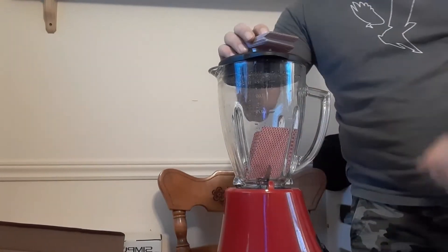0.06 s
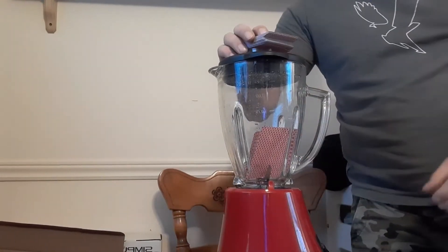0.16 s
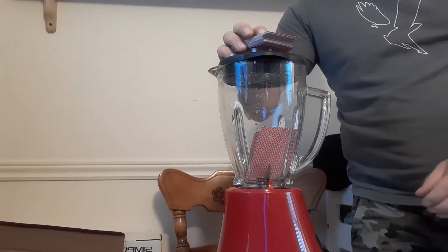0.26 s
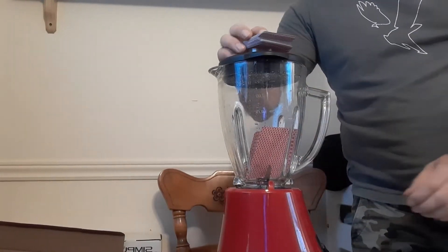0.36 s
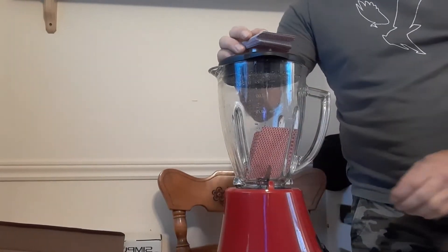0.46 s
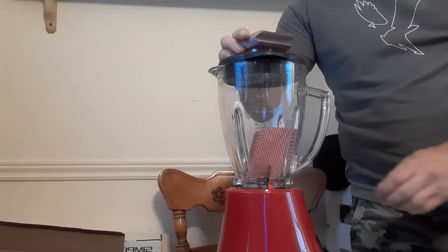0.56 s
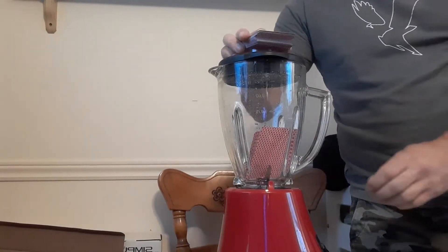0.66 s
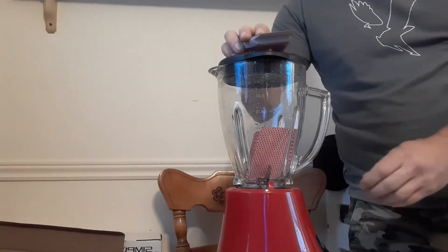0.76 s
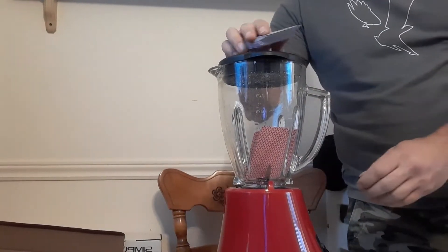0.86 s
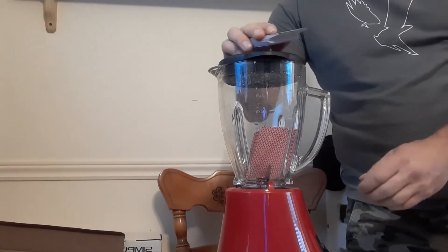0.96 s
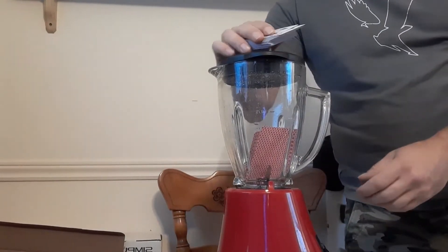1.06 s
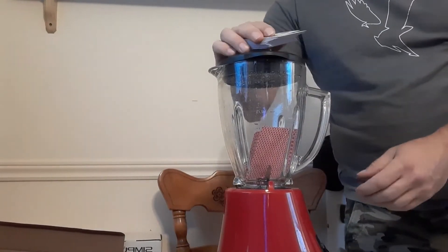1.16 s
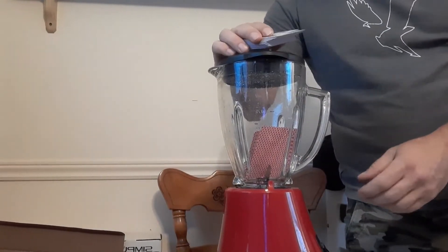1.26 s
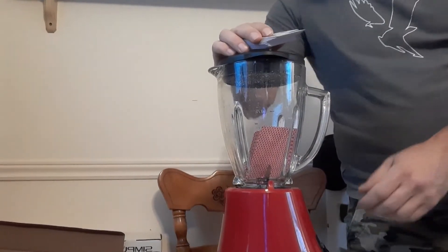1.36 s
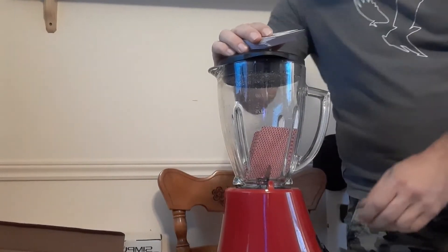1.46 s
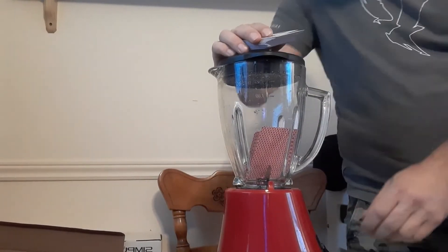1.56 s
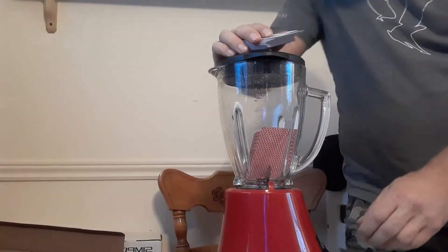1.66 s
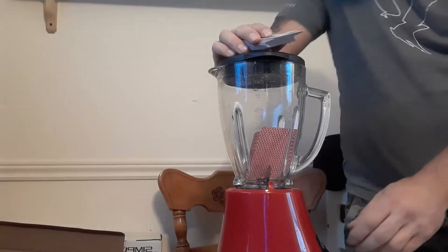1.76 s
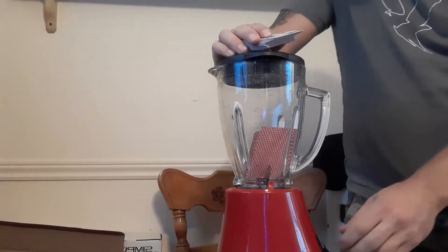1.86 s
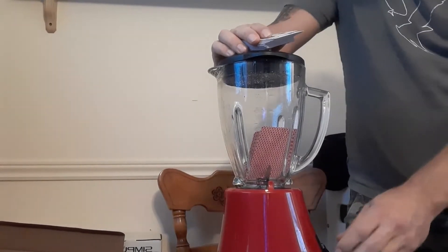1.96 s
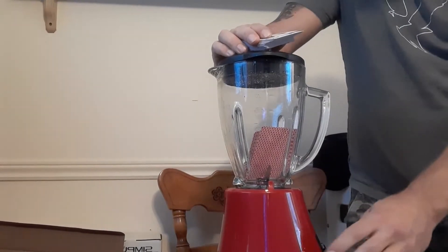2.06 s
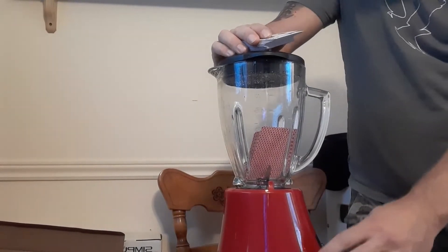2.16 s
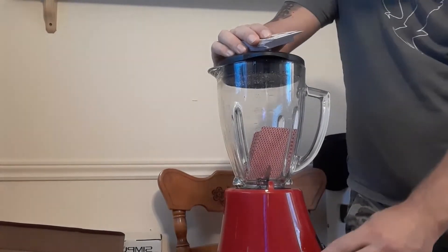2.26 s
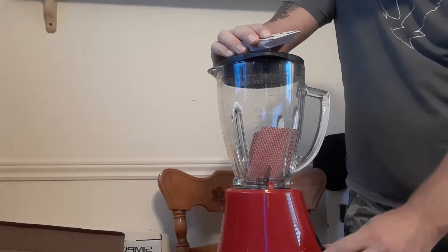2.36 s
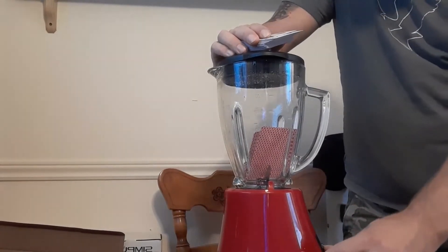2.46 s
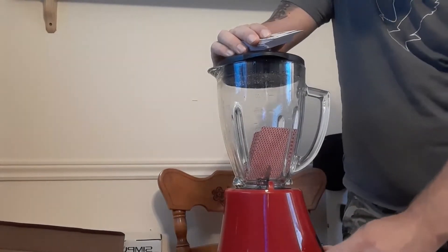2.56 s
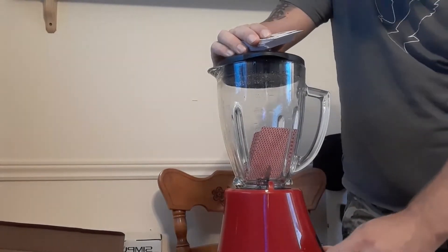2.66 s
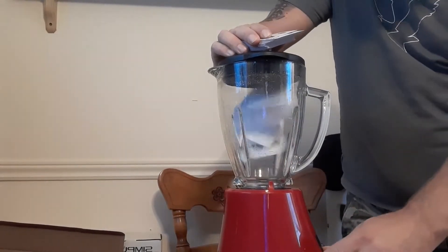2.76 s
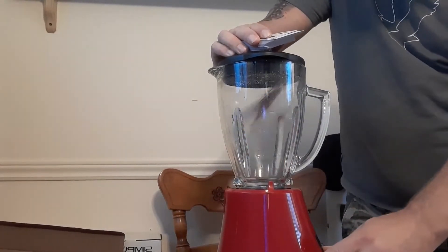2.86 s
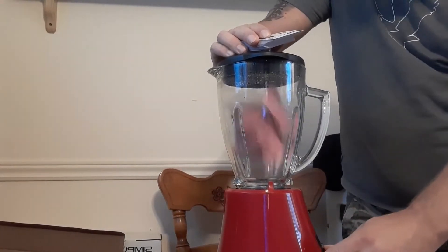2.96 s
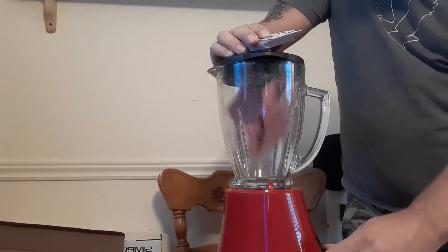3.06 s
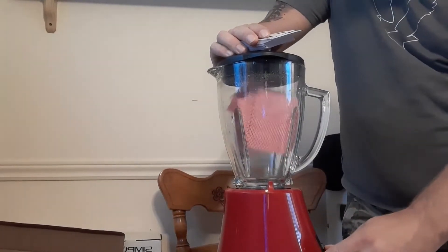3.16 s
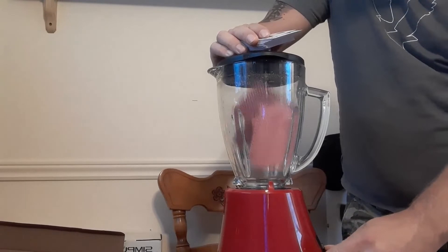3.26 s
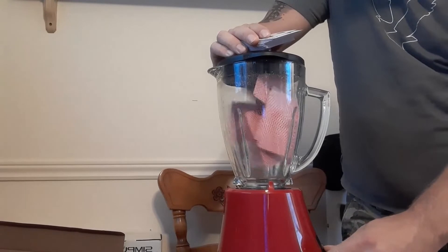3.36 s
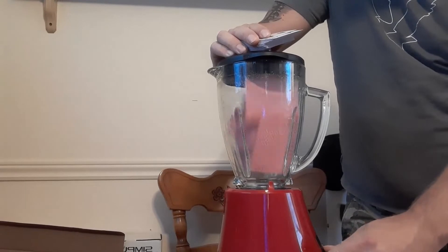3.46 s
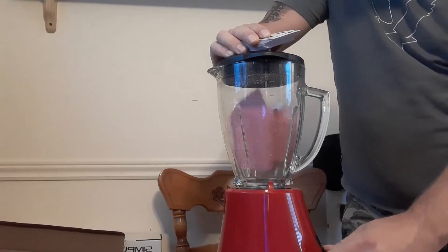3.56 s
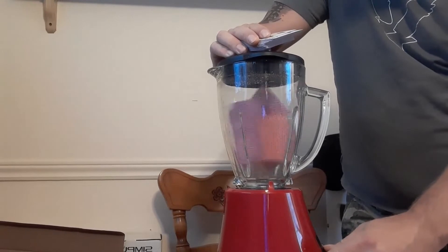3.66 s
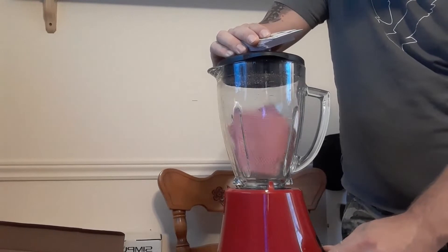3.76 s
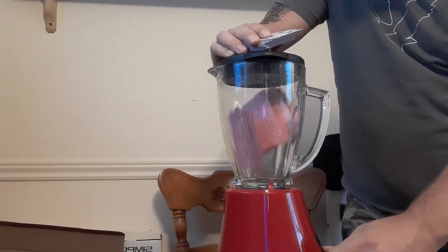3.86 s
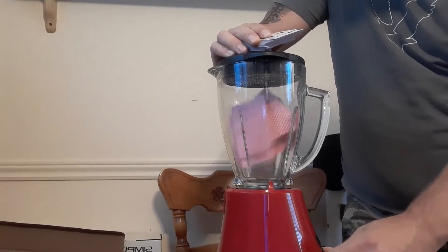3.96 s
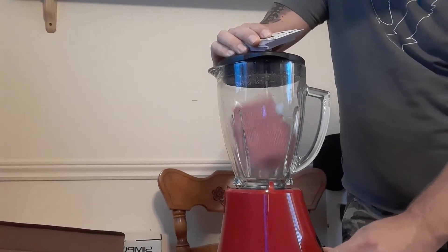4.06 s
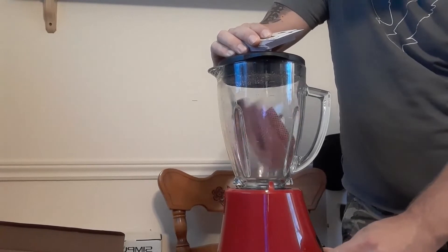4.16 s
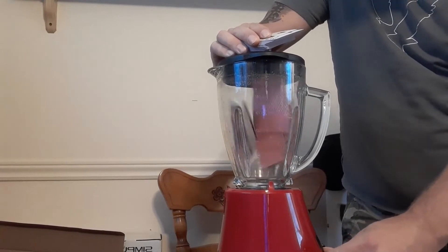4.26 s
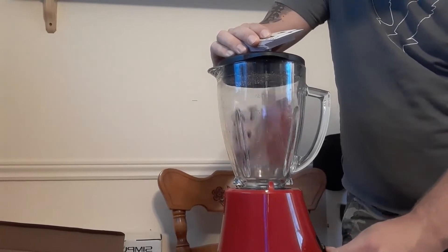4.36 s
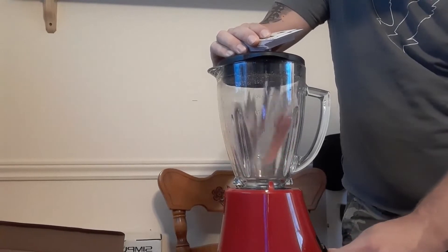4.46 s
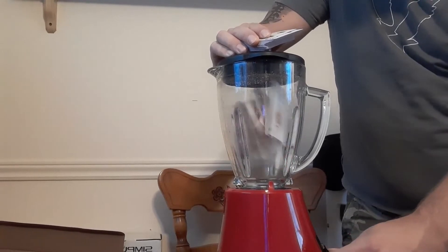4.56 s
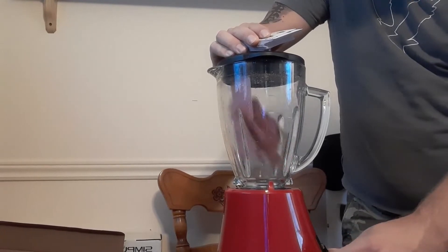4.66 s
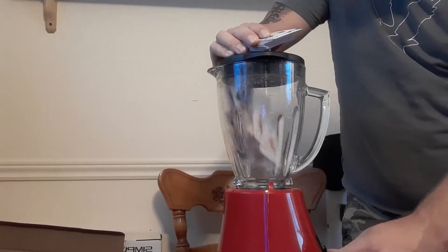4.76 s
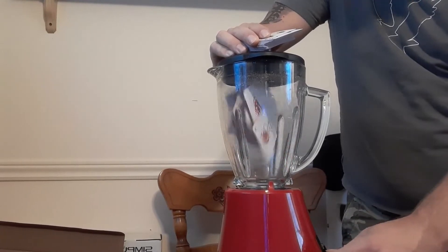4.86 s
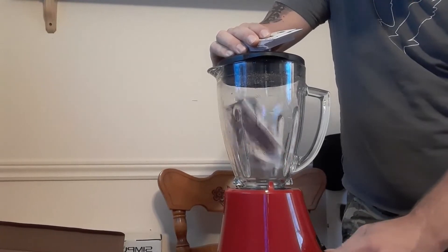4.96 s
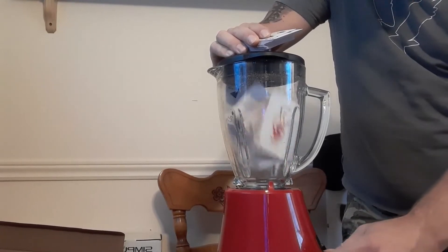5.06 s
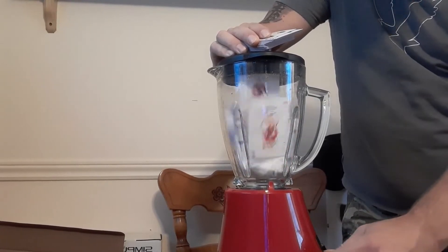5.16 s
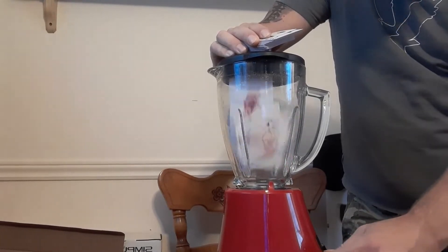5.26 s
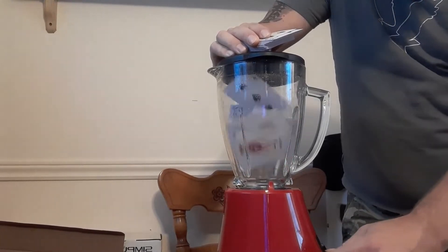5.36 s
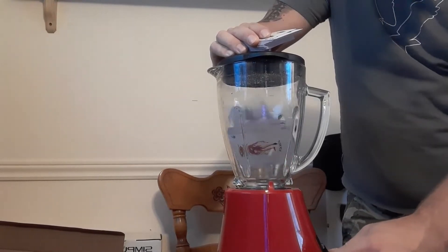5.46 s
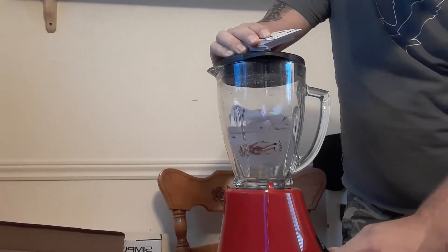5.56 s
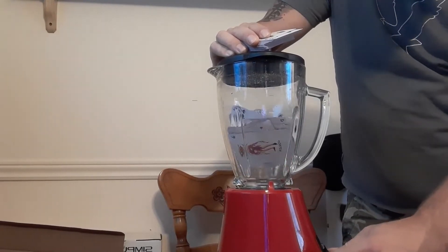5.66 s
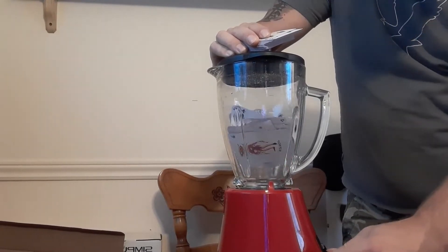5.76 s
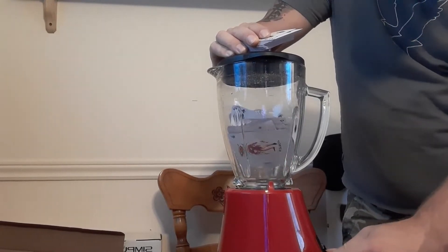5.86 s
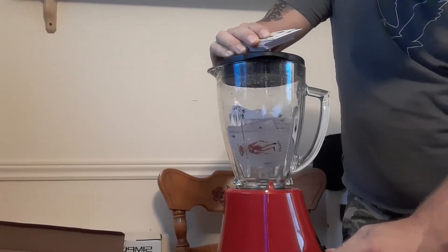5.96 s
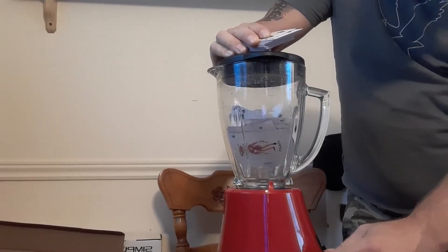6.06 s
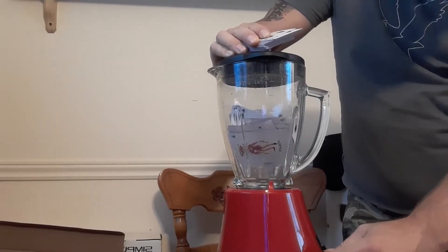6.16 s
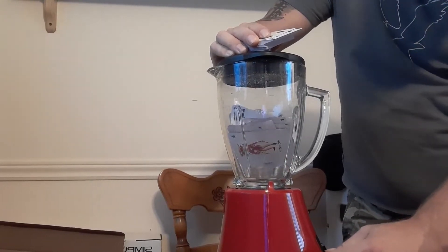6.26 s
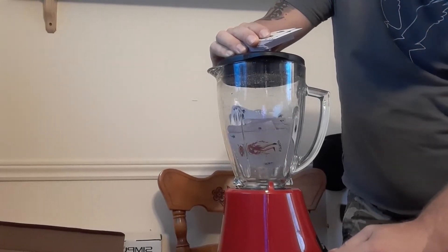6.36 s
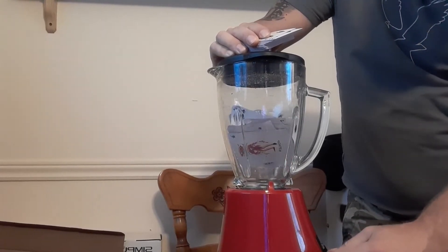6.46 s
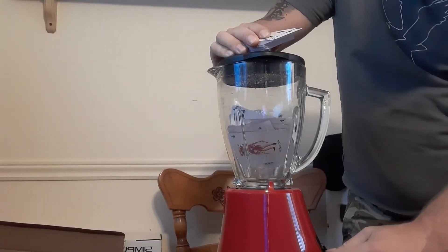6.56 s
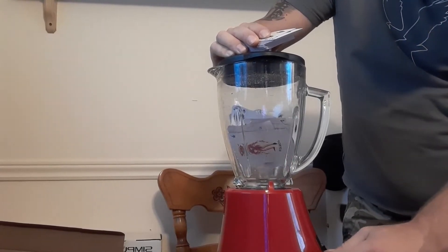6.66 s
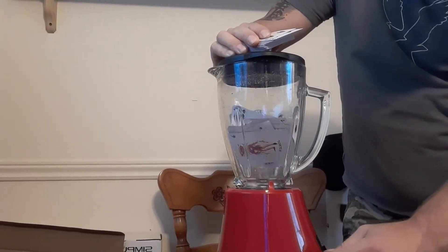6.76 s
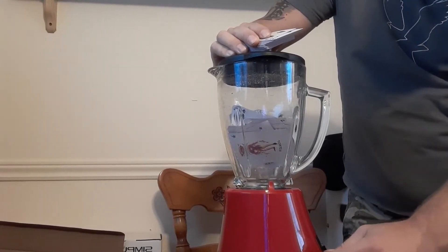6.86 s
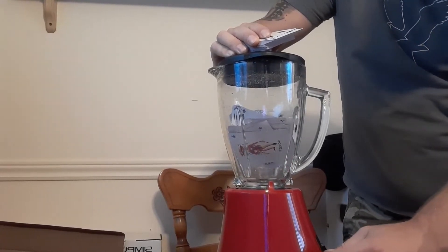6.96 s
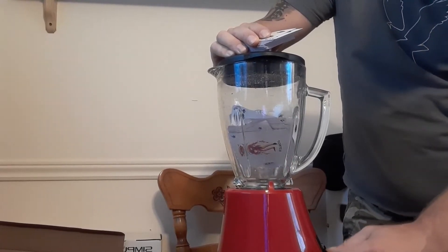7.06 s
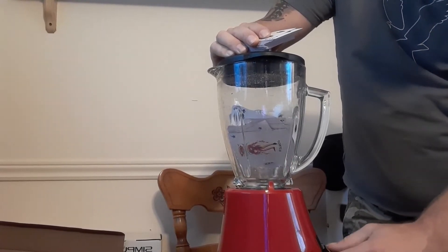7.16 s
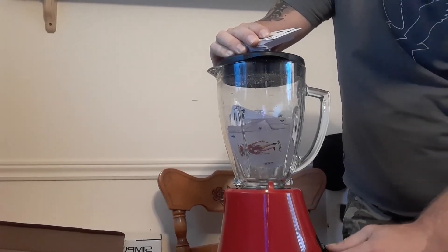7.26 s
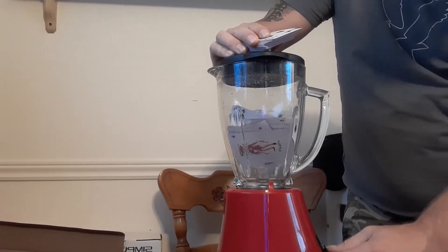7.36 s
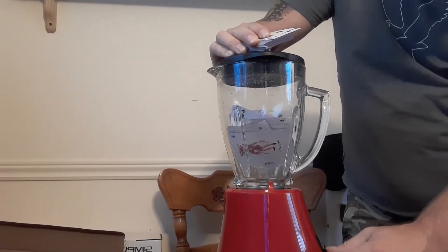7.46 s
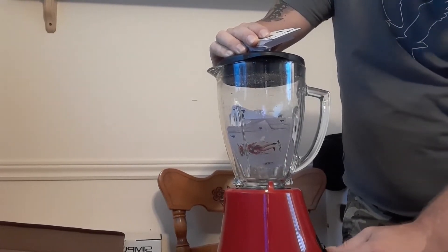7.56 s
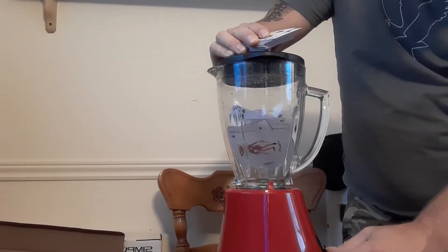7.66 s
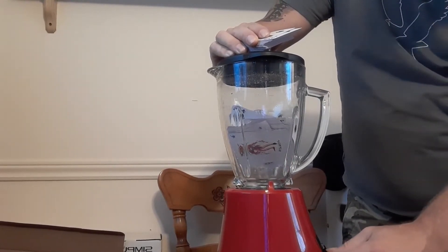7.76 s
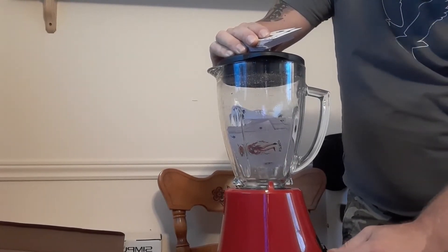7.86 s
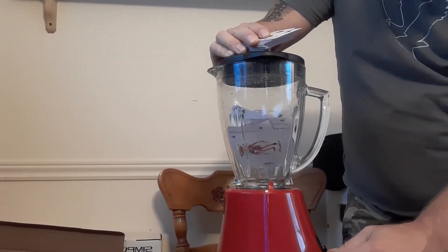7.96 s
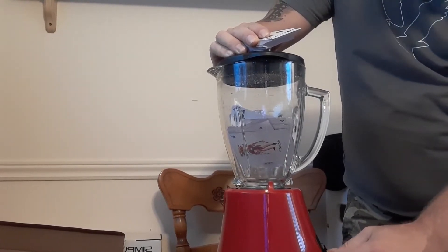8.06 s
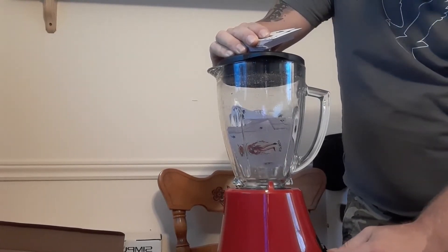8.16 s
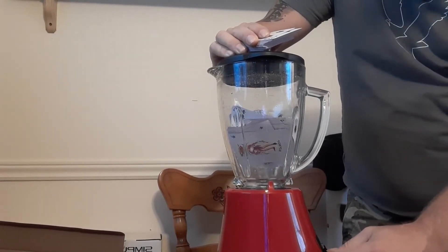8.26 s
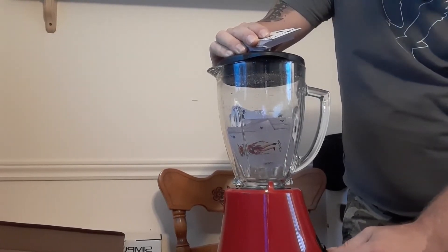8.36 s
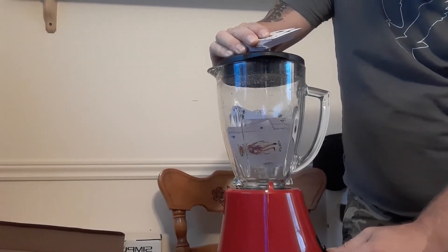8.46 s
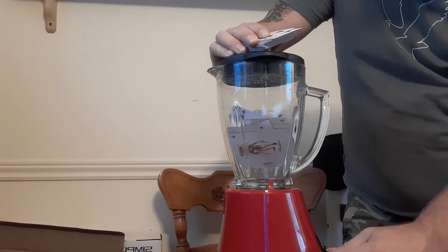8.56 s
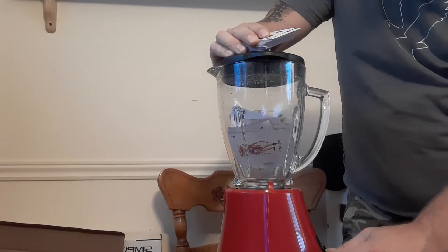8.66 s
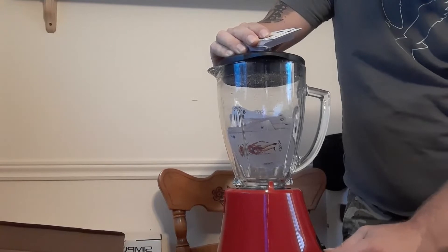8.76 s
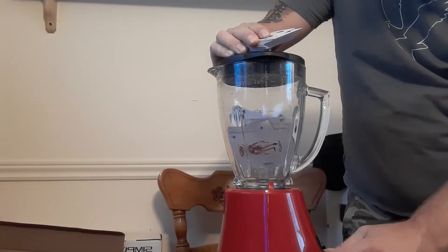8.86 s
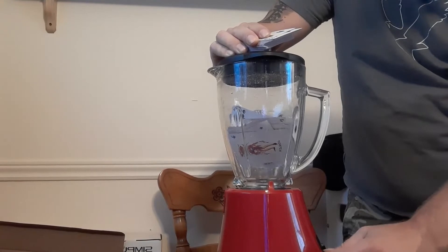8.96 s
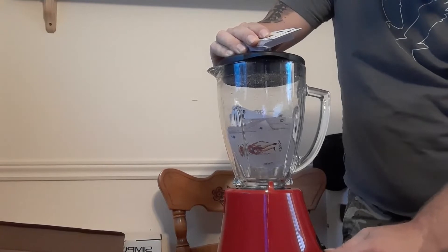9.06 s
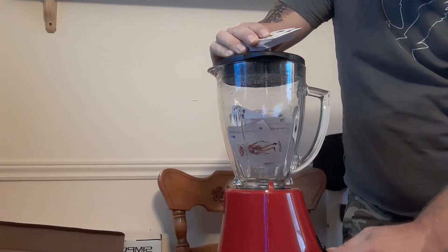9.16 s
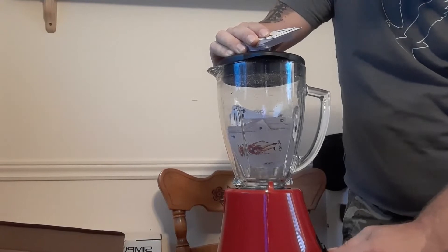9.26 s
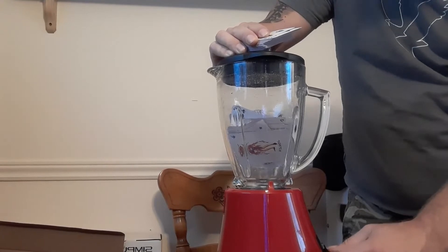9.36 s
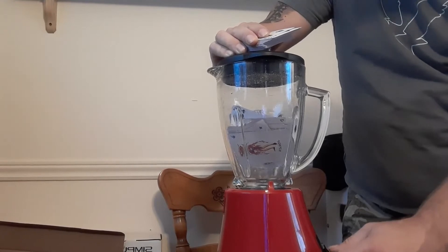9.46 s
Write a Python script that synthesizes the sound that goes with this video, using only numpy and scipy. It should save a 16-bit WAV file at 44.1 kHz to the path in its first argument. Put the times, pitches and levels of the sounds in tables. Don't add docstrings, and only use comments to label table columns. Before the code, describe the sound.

In a small quiet room, close up, cloth rustles, boards creak and hands thud and click softly for nearly three seconds. A glass-jar blender then bursts on with a loud clatter of cards striking blades and glass. Repeated pulses make the motor whine rise and sag; the slapping thins out after six seconds, leaving whirr and coasting hum, until a sharp click starts a final strong run.

```python
import sys
import numpy as np
from scipy import signal
from scipy.fft import rfft, irfft, next_fast_len
from scipy.io import wavfile
from scipy.ndimage import uniform_filter1d

SR = 44100
rng = np.random.default_rng(int(sys.argv[2]) if len(sys.argv) > 2 else 0)


def unload_wav(signal):
    wavfile.write(
        sys.argv[1],
        SR,
        np.round(np.clip(np.atleast_2d(signal).T, -1, 1) * 32767).astype(np.int16),
    )


def makeup_ratio(level_db):
    decades = np.asarray(level_db, float) / 20
    return 10 ** decades


N = 418950
T = np.arange(N) / SR

# f/Hz, density/dB per Hz
HUSH = [(15, -48), (25, -23), (91, 7.5), (156, -24), (228, 6), (333, -11), (618, -22), (767, -18),
        (1250, -21), (1630, -19), (1870, -21), (5200, -28), (6630, -20), (15700, -45)]
HUSH_DB = -66
# f/Hz, share/1
DIRECT_SHARE = [(100, .98), (400, .92), (900, .68), (2500, .68), (5000, .33), (10000, .06)]
# f/Hz, left over right/dB
LEFT_DB = [(60, -0.5), (150, 4.5), (380, 2), (950, 4), (2380, 5), (5980, -0.5), (15000, 6)]
# f/Hz, t60/s
ROOM_T60 = [(150, 0.29), (1000, 0.17), (4000, 0.21), (12000, 0.23)]

# t/s, floor boards level/dB, thin rustle level/dB, fade/dB per s
MOVES = [
    (.02, -74, -57, 100),
    (.33, -60.5, -85, 54),
    (.67, -64, -83, 30),
    (.81, -67, -53.5, 40),
    (1.01, -59.5, -55, 72),
    (1.48, -76, -51, 47),
    (1.67, -61.5, -51, 30),
    (1.86, -63, -48.5, 45),
    (2.07, -58, -39, 111),
    (2.48, -55, -61.5, 112),
]
SWELL_DB_PER_S, CLOTH_DB, RUSTLE_QUICKER, REST_DB = 127, -16.5, 2.3, -81.5
# t/s, peak level/dB, ring f/Hz, crack re peak/dB, t60/s
THUDS = [(0.204, -42.5, 308, -8, 0.21), (0.569, -50, 297, -16, 0.15), (0.78, -51, 335, -21, 0.13),
         (0.891, -47, 312, -20, 0.12), (0.999, -49, 323, -13, 0.31), (1.667, -43.5, 306, -3, 0.17),
         (1.767, -33, 423, -4, 0.06), (1.789, -29.5, 323, -12, 0.071), (1.935, -40.5, 308, -18, 0.21),
         (2.058, -45.5, 405, -11, 0.19), (2.074, -39, 272, -7.5, 0.24), (2.425, -35, 327, -17, 0.097),
         (2.526, -47, 293, -14, 0.13)]
# t/s, peak level/dB, ring f/Hz, t60/s
CLICKS = [(0.3047, -51, 2000, 0.015), (0.3397, -42, 2000, 0.015), (0.3504, -53, 2110, 0.015),
          (0.3805, -38.5, 2000, 0.015), (0.784, -49, 1630, 0.015), (1.1747, -56, 4600, 0.015),
          (1.6676, -41, 1370, 0.016), (1.8444, -54, 1910, 0.015), (1.9175, -47, 2070, 0.015),
          (2.3684, -63, 1440, 0.015), (2.5194, -61, 1460, 0.015), (2.5294, -66, 1250, 0.015),
          (2.6014, -55, 1260, 0.015), (2.7206, -21, 3260, 0.015), (3.864, -11, 3160, 0.011),
          (8.6789, -51, 1241, 0.015), (8.7206, -14.5, 2665, 0.011)]
# start t/s, end t/s, f/Hz, width/Hz, level/dB
SLIDES = [
    (0.289, 0.457, 2000, 700, -64),
    (0.55, .95, 7500, 500, -78),
    (.78, .93, 1800, 600, -72),
    (1.396, 1.56, 2730, 500, -74),
    (2.36, 2.43, 1300, 700, -67),
    (2.5, 2.66, 1190, 604, -78),
]

# t/s, peak level/dB, ring f/Hz, t60/s
FLATS = [(2.7487, -17, 2600, 0.16), (2.7796, -6, 1790, 0.076), (2.9719, -4, 2760, 0.073),
         (3.141, -7, 3510, 0.066), (3.2952, -11.5, 1260, 0.19), (3.3942, -12.5, 1080, 0.15),
         (3.761, -17, 3140, 0.16), (4.0356, -13, 1280, 0.051), (4.0914, -9.5, 2613, 0.13),
         (4.1864, -27, 3120, .091), (4.5268, -13, 3930, 0.19), (4.567, -7, 2606, 0.08),
         (4.7508, -6.5, 2560, .048), (5.0895, -11, 3530, 0.046), (5.234, -6, 2650, 0.056),
         (5.2822, -11.5, 3470, 0.16)]
# t/s, peak level/dB, ring f/Hz, t60/s
NICKS = [(2.8701, -5, 2600, 0.06), (2.988, -19, 3050, .063), (3.1219, -15, 1320, 0.16),
         (3.48, -17.5, 2030, 0.45), (3.5994, -12.5, 3090, 0.079), (3.923, -15.5, 2580, 0.1),
         (4.2173, -11.5, 3130, 0.17), (4.3876, -9.5, 1267, 0.15), (4.6932, -14, 1280, 0.22),
         (4.777, -10, 3180, 0.066), (4.931, -19, 4020, 0.15), (4.9756, -10, 1320, 0.072),
         (5.521, -7, 4100, 0.044), (5.815, -13, 2600, 0.07), (5.885, -10, 3060, 0.053),
         (8.504, -32, 2560, 0.085), (8.5829, -44, 3180, 0.06), (8.6537, -39, 1247, .071),
         (8.8044, -19, 3050, 0.053), (6.143, -11, 2600, 0.067)]
FLAT_THUMP_DB, NICK_THUMP_DB = -6, -11
# f/Hz, width/Hz, level/dB
JAR = [(1103, 16, 6), (1260, 94, 10), (2000, 190, 6), (2410, 30, 7.5), (2591, 47, 10.5), (2680, 45, 5),
       (2820, 100, 4.5), (3130, 116, 4), (3560, 85, 3.5), (3890, 260, 3.5), (6950, 630, 9),
       (4580, 900, 0.5), (7850, 390, 14.5)]
# f/Hz, width/Hz, level/dB
BASE = [(110, 15, 2), (242.6, 7.3, 13), (475, 11, -7.5)]

# on t/s, off t/s, shaft f at on/Hz, shaft f at off/Hz, mains buzz level/dB
PRESSES = [
    (2.722, 2.915, 26.8, 120, -36),
    (3.44, 3.72, 60, 69.96, -50),
    (3.865, 4.335, 53.7, 185.3, -40),
    (4.98, 5.43, 80.4, 187.8, -37),
    (6.055, 6.292, 93, 180, -53),
    (6.67, 7.02, 115, 202.4, -38.5),
    (8.716, 9.085, 8.5, 179.4, -39.5),
]
LAST_HZ = 119.4
SPIN_UP_S, COAST_S = 0.3, 2.5
SAG_S, SAG = 0.1, 0.08
# multiple of the shaft, level at mid speed/dB, slope/dB per octave of speed, driven gain/dB
ORDERS = [(1, 0, 7, -2), (2, -4.5, 10, 3.5), (3, -7, 8, -4), (4, -2, -6.5, -8), (5, 0, 10, -8),
          (6, -5, 9, -5), (8, -17, -15, -5)]
# f/Hz, gain/dB
RADIATES = [(40, -36), (80, -10), (124, 2), (145, -9), (175, -8), (212, -16), (250, 2), (330, 2), (400, -2),
            (445, 1), (510, -14), (680, -5), (860, -11), (950, -6)]
# t/s, shake level/dB
SHAKE = [(2.72, -32), (2.82, -22), (3.05, -34), (3.3, -28.5), (3.66, -27), (3.82, -40), (4.3, -31),
         (4.8, -38.5), (5.33, -43.5), (5.6, -32.5), (6.2, -34.5), (6.68, -32), (7.3, -35.5), (7.8, -29.5),
         (8.3, -36), (8.62, -47), (8.8, -27.5), (9.2, -31.5)]
SHAKE_POWER = 0.2
CARDS_JAM_S = 5.45
# t/s, drag level/dB
LOAD = [(2.72, 7), (2.78, 4.5), (2.885, 5), (2.915, 1.5), (2.96, 6.5), (3.15, 2.5), (3.5, 3.5), (3.85, -3),
        (3.95, 2), (4.58, 1), (4.68, -1), (4.76, 6.5), (4.9, -0.5), (5.6, 0), (5.85, 2.5), (6.08, -0.5),
        (8.45, 3), (8.76, 2.5)]
# f/Hz, density/dB per Hz
WHIRR = [(24, -63), (40, -22.5), (133, -5.5), (193, -16), (344, 5), (643, -10.5), (1110, -1), (1540, -6),
         (2610, -2.5), (3520, 1.5), (5260, -7), (7840, -12.5), (10300, -14), (12900, -8), (15800, -12.5)]
STALL_HZ, MID_HZ, DRIVEN_DB = 5.3, 125, 2
RUMBLE_DB, RUMBLE_POWER, RUMBLE_LOAD = -32, 0.71, 0.91
WHIRR_DB, WHIRR_POWER, WHIRR_LOAD = -22.5, 1.04, 1
FIZZ_DB, FIZZ_POWER, FIZZ_LOAD = -32.5, 1.19, 0.64


def evened(x):
    return x / np.sqrt(np.mean(x ** 2) + 1e-20)


def read(points, hz):
    f, value = np.transpose(points)
    return np.interp(np.log(hz + 1), np.log(f + 1), value)


def humps(modes, hz):
    return np.sqrt(1 + sum(makeup_ratio(2 * db) / (1 + (2 * (hz - f) / w) ** 2) for f, w, db in modes))


def colour(x, gain):
    log_gain = np.log(gain(abs(np.fft.fftfreq(8192, 1 / SR))) + 1e-5)
    taps = np.fft.ifft(np.exp(np.conj(signal.hilbert(log_gain)))).real[:4096]
    return signal.oaconvolve(x, taps)[:len(x)]


def passed(x, lo_hz, hi_hz, order=2):
    return signal.sosfilt(signal.butter(order, [lo_hz, hi_hz], "band", fs=SR, output="sos"), x)


def band(x, lo_hz, hi_hz):
    return evened(passed(x, lo_hz, hi_hz))


def split(x, low_hz, high_hz):
    hz = np.fft.rfftfreq(N, 1 / SR)
    low = 1 / (1 + (hz / low_hz) ** 6)
    high = 1 / (1 + (high_hz / (hz + 1)) ** 40)
    return [evened(irfft(rfft(x) * part, N)) for part in (low, 1 - low - high, high)]


def wander(hz):
    knots = np.arange(0, 10, 1 / hz)
    return evened(np.interp(T, knots, rng.standard_normal(len(knots))))


def add(mix, s, sound):
    part = mix[round(s * SR):][:len(sound)]
    part += sound[:len(part)]


def ring(hz, t60, t):
    return np.sin(2 * np.pi * hz * t) * makeup_ratio(-60 * t / t60)


def hush(hiss_db=-27):
    def gain(hz):
        return np.hypot(makeup_ratio(read(HUSH, hz)), makeup_ratio(hiss_db) * (hz > 10500))
    shared, left, right = rng.standard_normal((3, N))
    mixed = [colour(shared + 1.5 * own, gain) for own in (left, right)]
    return makeup_ratio(HUSH_DB) * evened(np.array(mixed))


def room(x):
    taps = np.zeros((2, SR // 2))
    at = np.arange(40, SR // 2 - 20, 20) + rng.integers(0, 20, (2, (SR // 2 - 41) // 20))
    np.put_along_axis(taps, at, rng.choice([-1., 1.], at.shape), 1)
    hz, t, z = signal.stft(taps, SR, nperseg=256)
    z = z * makeup_ratio(-60 * t / read(ROOM_T60, hz)[:, None])
    z = z / np.sqrt((abs(z) ** 2).sum(-1, keepdims=True))
    tails = signal.istft(z, SR, nperseg=256)[1]
    size = next_fast_len(N + SR)
    hz = np.fft.rfftfreq(size, 1 / SR)
    share = np.clip(read(DIRECT_SHARE, hz), 0, 1)
    early = np.exp(2j * np.pi * hz / SR * np.array([[1], [0]]))
    echoes = rfft(tails / np.linalg.norm(tails, axis=1, keepdims=True), size)
    balance = makeup_ratio(np.outer([0.5, -0.5], read(LEFT_DB, hz)))
    ports = (np.sqrt(share) * early + np.sqrt(1 - share) * echoes) * balance
    return irfft(rfft(x, size) * ports, size)[:, :N]


def moves(column, quicker):
    total = 0
    for row in MOVES:
        db_per_s = np.where(T < row[0], SWELL_DB_PER_S, row[3])
        total = total + makeup_ratio(row[column] - quicker * db_per_s * abs(T - row[0]))
    return total


def rubbing():
    weight = makeup_ratio(REST_DB) + moves(column=1, quicker=1)
    thin = moves(column=2, quicker=RUSTLE_QUICKER)
    a, b, c = rng.standard_normal((3, N))
    boards = band(band(a, 210, 440), 210, 440) + 0.45 * band(a, 70, 160)
    creak = weight * makeup_ratio(2.5 * wander(25)) * boards
    cloth = weight * makeup_ratio(CLOTH_DB + 2.2 * wander(44)) * band(b, 540, 2700)
    rustle = thin * makeup_ratio(-16.5 + 2.0 * wander(81)) * band(c, 2400, 7900)
    return creak + cloth + rustle


def thuds():
    out, crack, t = np.zeros(N), np.zeros(N), T[:9000]
    for s, db, hz, crack_db, t60 in THUDS:
        boards = ring(hz, t60, t) + 0.49 * ring(119, 0.79 * t60, t)
        boards += 0.5 * ring(1.4 * hz, 0.58 * t60, t) + 0.6 * ring(0.78 * hz, 1.3 * t60, t)
        add(out, s, makeup_ratio(db) * boards * (1 - np.exp(-t / 0.0028)))
        add(crack, s, makeup_ratio(db + crack_db - 60 * t / (1.2 * t60)) * rng.standard_normal(9000))
    return out + 2.0 * passed(crack, 450, 2000, order=3)


def clicks():
    out, t = np.zeros(N), T[:9000]
    for s, db, hz, t60 in CLICKS:
        snap = signal.lfilter(*signal.iirpeak(hz, 3.0, SR), rng.standard_normal(9000))
        snap *= makeup_ratio(-60 * t / (2.8 * t60))
        modes = 0.36 * ring(hz, t60, t) + 0.5 * ring(1.87 * hz, 0.31 * t60, t)
        add(out, s, makeup_ratio(db) * (modes + 1.76 * snap))
    return out


def slides():
    out = np.zeros(N)
    for start, end, hz, width_hz, db in SLIDES:
        scrape = band(rng.standard_normal(SR // 2), hz - width_hz / 2, hz + width_hz / 2)
        scrape = scrape[:round((end - start) * SR)]
        add(out, start, makeup_ratio(db) * scrape * signal.windows.tukey(len(scrape), 0.6))
    return out


def slaps():
    out, low, t = np.zeros(N), np.zeros(N), T[:9000]
    strikes = [(*row, FLAT_THUMP_DB) for row in FLATS] + [(*row, NICK_THUMP_DB) for row in NICKS]
    for s, db, hz, t60, thump_db in strikes:
        noise = rng.standard_normal(9000)
        shape = (1 - np.exp(-t / 0.0023)) * makeup_ratio(db - 60 * t / t60)
        crack = makeup_ratio(db) * np.exp(-t / 0.0017)
        add(out, s, (shape + crack) * noise + 0.24 * makeup_ratio(db) * ring(hz, 0.72 * t60, t))
        add(low, s, makeup_ratio(thump_db) * shape * noise)
    bright = colour(out, lambda hz: makeup_ratio(1.015 * read(WHIRR, hz)) * humps(JAR, hz) * (hz > 500))
    return bright + 2.64 * passed(low, 150, 900)


def shaft():
    def eased(u, tau):
        return (1 - np.exp(-u / tau)) / (1 - np.exp(-u[-1] / tau))
    hz = np.full(N, PRESSES[0][2] * 1.)
    following = PRESSES[1:] + [(T[-1] + 1e-3, 0, LAST_HZ)]
    for (on, off, low_hz, top_hz, _), (stop, _, end_hz, *_) in zip(PRESSES, following):
        up = (T >= on) & (T < off)
        down = (T >= off) & (T < stop)
        hz[up] = low_hz + (top_hz - low_hz) * eased(T[up] - on, SPIN_UP_S)
        u = T[down] - off
        fall = SAG * eased(u, SAG_S) + (1 - SAG) * eased(u, COAST_S)
        hz[down] = top_hz + (end_hz - top_hz) * fall
    return hz


def shaft_orders(shaft_hz, turns, jolted, driven):
    octaves = np.clip(np.log2(shaft_hz / MID_HZ), -1.6, 1)
    tones = np.zeros(N)
    for k, db, slope_db, driven_db in ORDERS:
        level_db = db + slope_db * octaves + driven_db * driven + read(RADIATES, k * shaft_hz)
        level_db = level_db + 1.2 * jolted ** 1.4 * wander(20)
        tones += makeup_ratio(level_db) * np.sin(2 * np.pi * k * turns)
    return tones


def mains_buzz(held, mains):
    harmonics = np.sin(mains) + 1.16 * np.sin(2 * mains) + 0.35 * np.sin(3 * mains)
    return held * makeup_ratio(5.0 * wander(20)) * harmonics


def whirr(pace, turns, driven, mains):
    gate, spark, rattle, flicker_db = 0.5, 0.3, 0.9, 1.0
    drag_db = np.interp(T, *np.transpose(LOAD))
    swing = 1 + gate * np.cos(2 * np.pi * turns) + spark * driven * np.cos(mains)
    puffs = swing * rng.standard_normal((2, N))
    ticks = makeup_ratio(3.0 * np.minimum(rng.exponential(1, (2, N)), 3))
    ticks *= (rng.random((2, N)) < 900 / SR) * rng.choice([-1, 1], (2, N))
    level = makeup_ratio(DRIVEN_DB * driven - 4.5 + flicker_db * wander(110))
    low = makeup_ratio(RUMBLE_DB + RUMBLE_LOAD * drag_db) * pace ** RUMBLE_POWER
    mid = makeup_ratio(WHIRR_DB + WHIRR_LOAD * drag_db) * pace ** WHIRR_POWER
    high = makeup_ratio(FIZZ_DB + FIZZ_LOAD * drag_db) * pace ** FIZZ_POWER
    places = []
    for drive in evened(puffs) + rattle * evened(ticks):
        body = colour(drive, lambda hz: makeup_ratio(read(WHIRR, hz)) * humps(JAR + BASE, hz))
        rumble, hiss, fizz = split(body, 710, 8830)
        places.append(level * (mid * hiss + low * rumble + high * fizz))
    return places


def motor():
    shaft_hz = shaft()
    pace = np.maximum(shaft_hz - STALL_HZ, 0.3) / (MID_HZ - STALL_HZ)
    jolted = 1 + 2.2 * (T < CARDS_JAM_S)
    turns = np.cumsum(shaft_hz * (1 + 0.007 * jolted * wander(25))) / SR
    held = sum(makeup_ratio(db) * ((T > on) & (T < off)) for on, off, *_, db in PRESSES)
    held = uniform_filter1d(held, 500)
    driven = uniform_filter1d((held > 1e-4) * 1., 2000)
    mains = 2 * np.pi * 124.6 * T
    running = np.clip((T - PRESSES[0][0]) / 0.0026, 0, 1)
    shake = makeup_ratio(np.interp(T, *np.transpose(SHAKE))) * pace ** SHAKE_POWER
    tones = shake * shaft_orders(shaft_hz, turns, jolted, driven)
    first_place, second_place = whirr(pace, turns, driven, mains)
    return running * (first_place + tones) + mains_buzz(held, mains), running * second_place


def scene():
    first_place, second_place = motor()
    handling = rubbing() + thuds() + clicks()
    return room(first_place + slaps() + handling + slides()) + room(second_place) + hush()


def low_pass(x):
    return signal.sosfilt(signal.butter(12, 16820, fs=SR, output="sos"), x)


def record(dry):
    edge = signal.firwin(511, 15800, window=("kaiser", 9), fs=SR)
    mix = np.clip(signal.oaconvolve(dry, edge[None], "same"), -1, 1)
    return low_pass(mix)


dry = scene()
out = record(dry)
unload_wav(out)
```